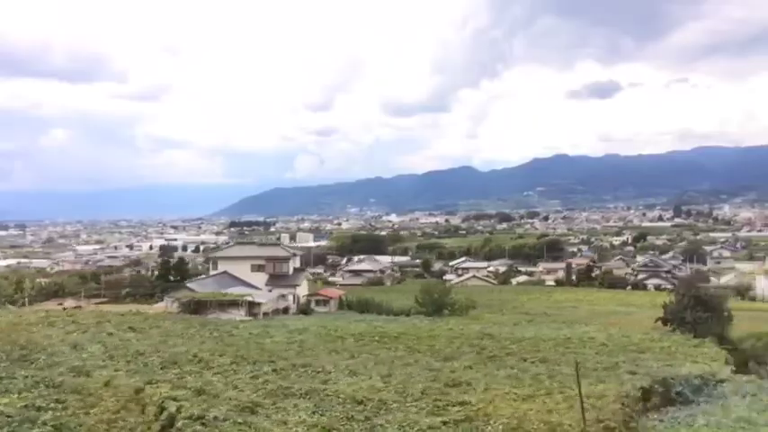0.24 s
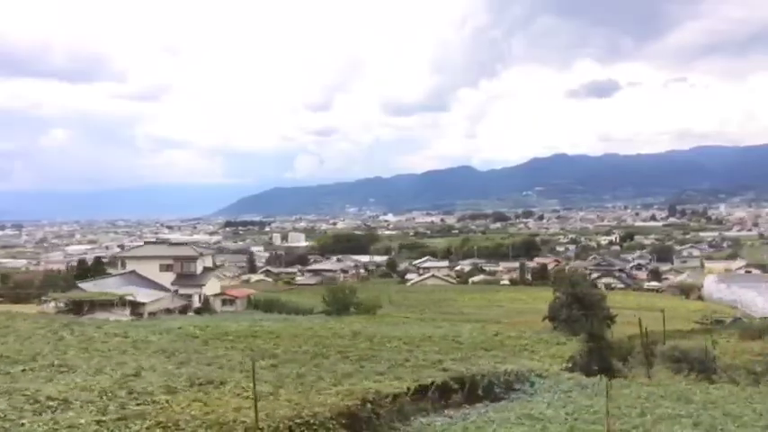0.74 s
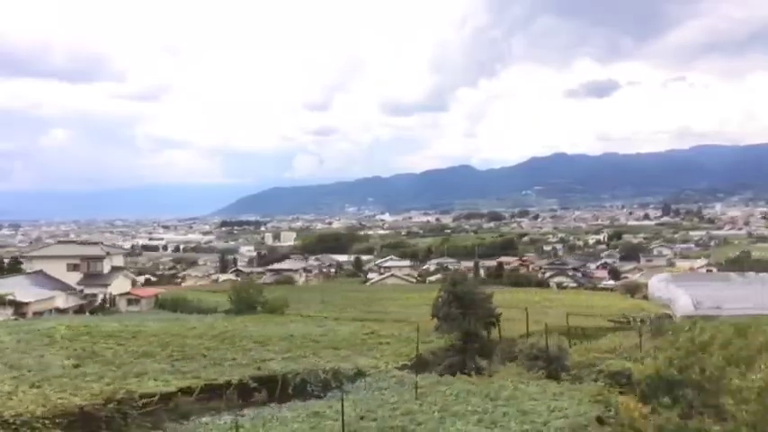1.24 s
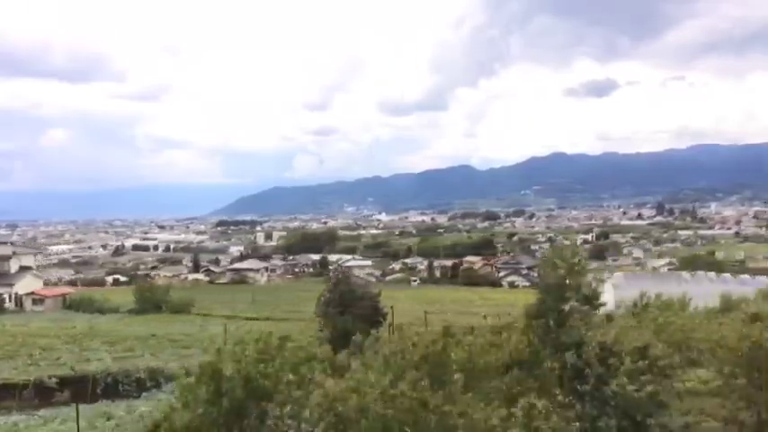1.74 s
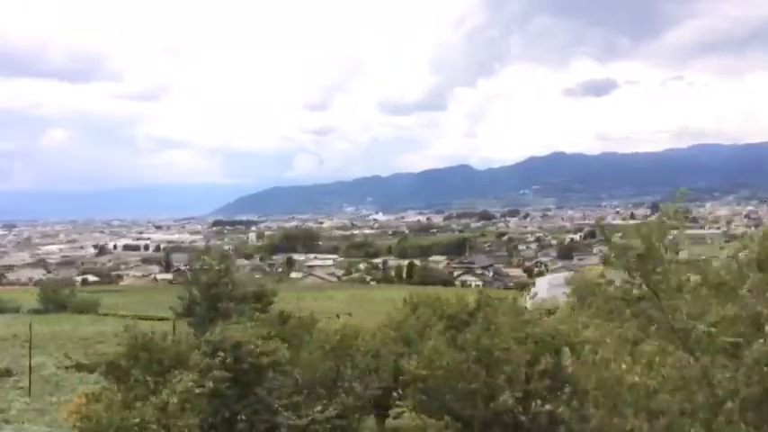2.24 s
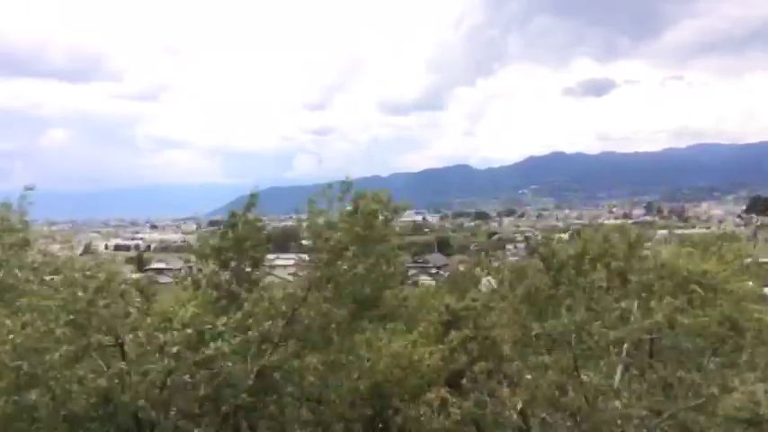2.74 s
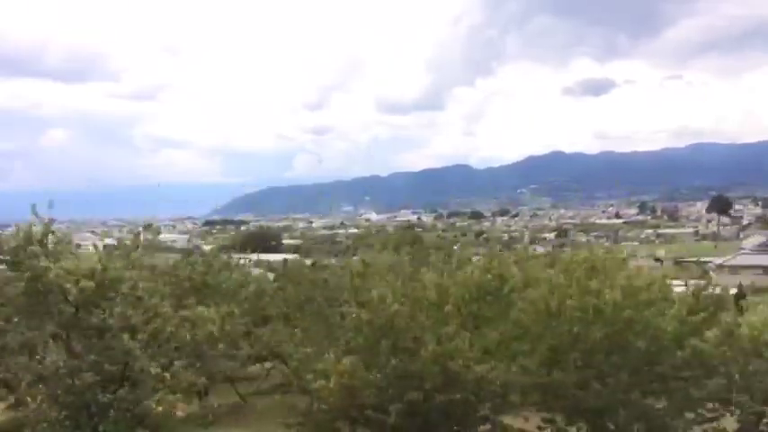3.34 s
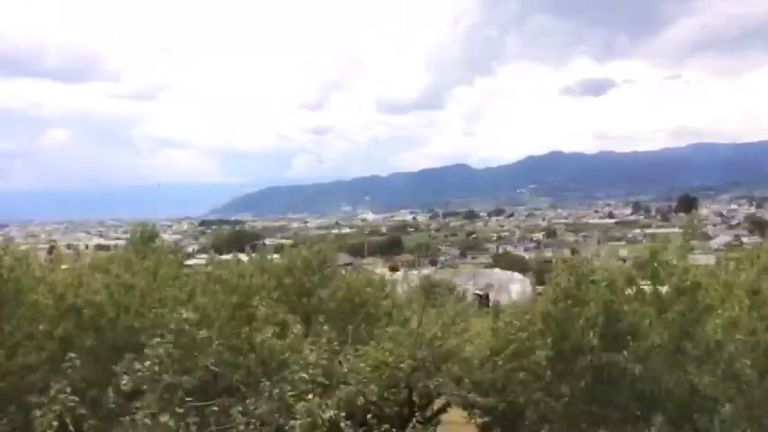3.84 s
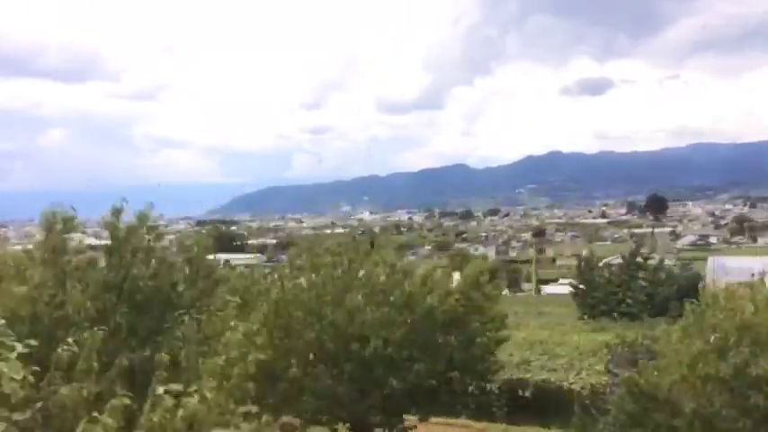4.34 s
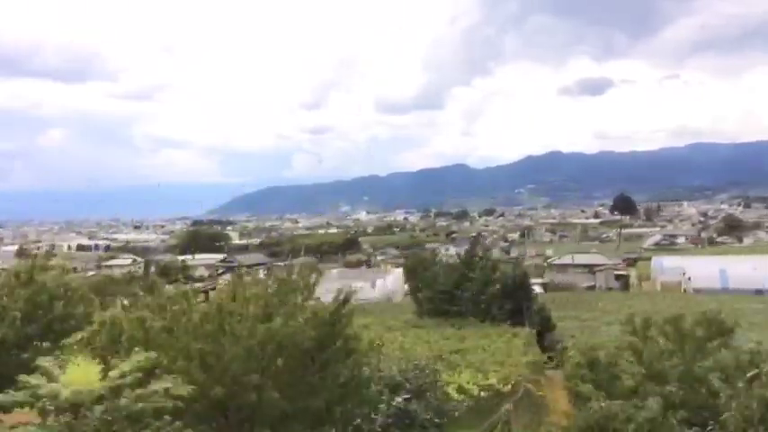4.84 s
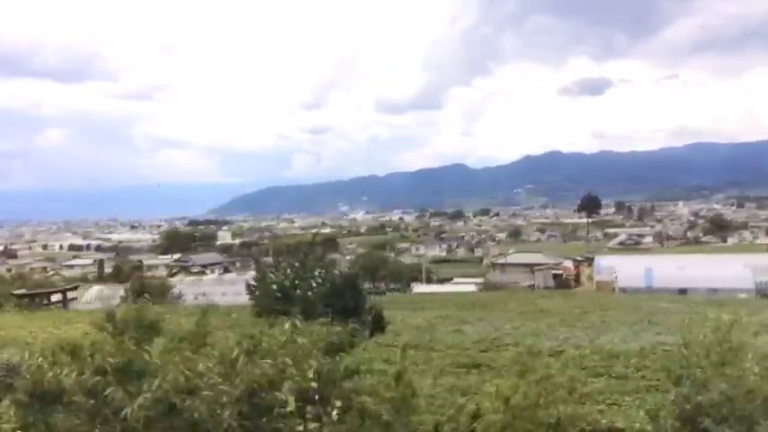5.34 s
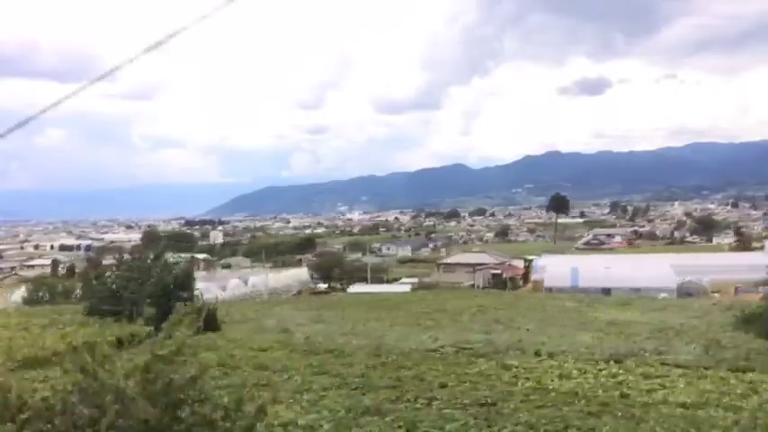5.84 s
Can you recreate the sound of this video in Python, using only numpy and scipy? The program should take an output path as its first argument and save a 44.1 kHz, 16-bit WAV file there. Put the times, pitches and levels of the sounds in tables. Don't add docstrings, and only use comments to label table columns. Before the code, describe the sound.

Heard from inside a fast electric train, close to the window. Air rush, rail hiss and deep floor rumble run throughout. Within the first half second a loose fitting chinks, the pane knocks, the floor thuds and a finger ticks sharply on the camera. Irregular jolts then keep knocking pane, floor and wall panels, with faint rattles between, until an abrupt end.

```python
import sys
import numpy as np
from scipy import signal
from scipy.fft import rfft, irfft
from scipy.io import wavfile
from scipy.ndimage import uniform_filter1d

SR = 44100
rng = np.random.default_rng(int(sys.argv[2]) if len(sys.argv) > 2 else 0)


def put_to_file(sound):
    columns = np.atleast_2d(sound).T
    safe = np.clip(columns, -1, 1)
    whole_steps = np.round(safe * 32767)
    wavfile.write(sys.argv[1], SR, whole_steps.astype(np.int16))


def linear_from_db(decibels):
    return 10 ** (np.asarray(decibels, float) / 20)


N = 269010

# time in seconds, shaking of the floor in dB, drumming of the bogie in dB,
# roughness of the rail head in dB.
TRACK = [(0.0, -28, -30.5, -35.5), (0.25, -30, -30, -35.5), (0.52, -32, -33.5, -36.5), (0.9, -28, -28, -35),
         (1.19, -29, -33, -36), (1.65, -31, -32.5, -35), (2.17, -24, -31, -36), (2.58, -31.5, -34, -36.5),
         (2.84, -31, -32, -36), (3.11, -29.5, -30.5, -36), (3.57, -29.5, -34, -36),
         (4.04, -32.5, -33, -36.5), (4.26, -30.5, -31.5, -35.5), (4.55, -26.5, -30, -36),
         (5.11, -27, -32, -37), (5.49, -32, -33, -36.5), (5.64, -28.5, -32, -34.5), (6.1, -24, -31.5, -38)]


def curve(table, column):
    rows = np.array(table)
    return np.interp(np.arange(N) / SR, rows[:, 0], rows[:, column])


def swing(table, column):
    db = curve(table, column)
    return db - db.mean()


def walk(rate):
    hold = int(SR / rate)
    levels = np.repeat(rng.standard_normal(N // hold + 1), hold)
    return 1.075 * uniform_filter1d(uniform_filter1d(levels, hold), hold)[:N]


def coloured(shape):
    hz = np.arange(N // 2 + 1) * SR / N + 1e-3
    return irfft(rfft(rng.standard_normal(N)) * shape(hz), N)


def band(colour, lo_hz, hi_hz, flicker_db, rate):
    at, db = np.transpose(colour)

    def slice_shape(hz):
        edge = 1 / np.sqrt((1 + (lo_hz / hz) ** 12) * (1 + (hz / hi_hz) ** 12))
        return linear_from_db(np.interp(np.log(hz), np.log(at), db)) * edge

    noise = coloured(slice_shape) * linear_from_db(flicker_db * walk(rate))
    return noise / noise.std()


def add(out, sound, s):
    i = int(round(s * SR))
    out[i:i + len(sound)] += sound[:N - i]


def rush():
    # frequency in Hz, density in dB per Hz.
    air_colour = [(1800, 3), (2300, 1.5), (3000, -5), (4000, -17), (5000, -25), (6300, -30.5),
                  (8000, -40.5), (10000, -46), (15000, -47.5)]
    # frequency in Hz, width in Hz, level in dB.
    wheel_modes = [
        (2520, 80, -4.5),
        (2600, 280, -2),
        (1358, 120, 4.5),
        (1231, 120, -0.5),
        (1546, 170, 3),
        (824, 87, 3.5),
        (5930, 540, -33),
        (3310, 130, -17.5),
    ]
    # time in seconds, gust level in dB.
    gusts = [(0.0, -57), (1.19, -59), (1.61, -57.5), (1.95, -58), (2.26, -61), (2.99, -57), (3.09, -59),
             (3.77, -62), (3.92, -60.5), (4.06, -57), (4.23, -60), (4.48, -58.5), (4.72, -62.5), (5.3, -61),
             (5.66, -60), (6.1, -60.5)]
    at, db = np.transpose(air_colour)
    smooth = coloured(lambda hz: linear_from_db(np.interp(np.log(hz), np.log(at), db)) / (1 + (2000 / hz) ** 6))
    spectrum = rfft(smooth / smooth.std())
    hz = np.arange(N // 2 + 1) * SR / N
    eddies = walk(40)
    gust, rough = swing(gusts, 1), swing(TRACK, 3)
    low_db = -52.5 + 1.1 * gust
    high_db = -47.5 + 0.88 * gust
    ring_db = -50.5 + 0.74 * gust + 0.49 * rough
    air = 0
    for step, up in enumerate([0, 0, .4, .7, 1, 1, 1]):
        share = np.clip(1 - abs(2 * np.log2(hz / 2000 + 1e-9) - step), 0, 1)
        level_db = low_db + up * (high_db - low_db + .9 * eddies) + 2.0 * walk(22)
        air = air + irfft(spectrum * share, N) * linear_from_db(level_db)
    for f, width, db in wheel_modes:
        sway = [coloured(lambda hz: 1 / (1 + (hz / width) ** 2 * 4)) for _ in range(2)]
        turn = 2 * np.pi * np.cumsum(f * (1 + .016 * walk(10))) / SR
        ring = (sway[0] * np.cos(turn) + sway[1] * np.sin(turn)) * linear_from_db(3.0 * walk(14))
        air = air + linear_from_db(db + ring_db) * ring / ring.std()
    return air


def rolling():
    # frequency in Hz, density in dB per Hz.
    carriage = [(20, -27), (40, -13.5), (62, 5.5), (100, -0.5), (160, 0), (230, 2.5), (300, -2.5),
                (380, -4), (520, 0.5), (800, -1), (970, -3), (1350, 1.5), (1700, -7), (2200, -12)]
    shake, drum, rough = swing(TRACK, 1), swing(TRACK, 2), swing(TRACK, 3)
    sway = linear_from_db(-38.5 + .4 * shake) * band(carriage, 15, 60, 1.5, 12)
    boom = linear_from_db(-27 + .9 * shake) * band(carriage, 56, 165.6, 2.2, 30)
    walls = linear_from_db(-28.5 + .3 * shake + 1.2 * drum) * band(carriage, 160, 372.0, 2.1, 40)
    roar = linear_from_db(-36.0 + 0.59 * drum + 0.2 * rough) * band(carriage, 380, 1100, 1.6, 30)
    song = linear_from_db(-37.5 + 1.8 * rough) * band(carriage, 972, 2160, 1.8, 25)
    return sway + boom + walls + roar + song


def chinks():
    # start in seconds, peak in dB, fitting. The "latch" rows at 2.41 s and 2.601 s
    # are small knocks of the pane, ringing near 480 Hz.
    contacts = [(.17, -26, "brake"), (0.219, -36, "rack"), (0.501, -37.5, "rack"), (0.649, -52, "rod"),
                (.76, -44, "rod"), (1.133, -30.5, "latch"), (1.565, -67, "clip"), (1.568, -46, "rod"),
                (1.68, -32.5, "brake"), (1.755, -61, "strap"), (1.82, -60, "strap"), (2.111, -21, "frame"),
                (2.13, -66, "hinge"), (2.41, -21, "latch"), (2.517, -18.5, "frame"), (2.551, -39.5, "rod"),
                (2.94, -68, "clip"), (2.601, -24, "latch"), (2.955, -65, "clip"), (3.515, -68, "clip"),
                (4.059, -28.5, "brake"), (4.07, -72, "clip"), (4.469, -46, "rod"), (5.155, -35, "rack"),
                (5.17, -36.5, "hook"), (5.75, -61, "strap"), (5.63, -29.5, "brake")]
    # frequency in Hz, width in Hz, decay by 60 dB in seconds.
    fittings = dict(latch=(480, 165, .045), strap=(6100, 500, .08), clip=(10000, 8500, .04),
                rack=(2550, 350, .1), hook=(2250, 600, .15), rod=(3000, 900, .04), frame=(800, 250, .03),
                hinge=(7500, 1500, .1), brake=(1330, 100, .45))
    out, t = np.zeros(N), np.arange(SR // 2) / SR
    for (s, db, fitting), noise in zip(contacts, rng.standard_normal((len(contacts), len(t)))):
        hz, width, t60 = fittings[fitting]
        edges = np.clip([hz - width / 2, hz + width / 2], 100, 16000)
        resonance = signal.butter(3, edges, "bandpass", fs=SR, output="sos")
        envelope = linear_from_db(-60 * t / t60) * (1 - np.exp(-t / .004))
        scrape = signal.sosfilt(resonance, noise * envelope)
        add(out, linear_from_db(db) * scrape / abs(scrape).max(), s)
    return out


def thuds():
    # centre in seconds, peak in dB, frequency in Hz.
    floor_jolts = [(0.35, -5.5, 120), (0.581, -10.5, 93), (0.796, -15.5, 140), (0.883, -18, 94),
                   (1.251, -12, 105), (1.349, -14, 97), (1.537, -11.5, 93.5), (1.829, -13.5, 91),
                   (1.913, -12, 102), (1.999, -8, 161), (2.039, -7, 93), (2.084, -11, 105),
                   (2.22, -10.5, 106), (2.302, -6.5, 97), (2.533, -8.5, 125.5), (3.059, -13.5, 114),
                   (3.126, -5.5, 95), (3.427, -9.5, 136), (3.605, -14.5, 112), (3.847, -11.5, 99),
                   (4.361, -14.5, 98), (4.497, -9.5, 103), (4.569, -9.5, 100), (4.671, -4.5, 95),
                   (4.755, -10, 104.5), (4.958, -13, 87), (5.001, -6, 87), (5.062, -5, 85),
                   (5.355, -10.5, 89), (5.886, -5.5, 79)]
    # centre in seconds, peak in dB, frequency in Hz.
    wall_jolts = [(0.782, -11, 240), (0.803, -8, 212), (0.837, -15, 261), (0.862, -11, 203),
                  (0.906, -15, 249), (0.924, -11, 224), (1.16, -13.5, 160), (1.986, -11.5, 221),
                  (2.014, -14.5, 262), (2.089, -17, 215), (2.22, -13, 225), (2.239, -18, 213),
                  (2.37, -10.5, 195), (2.42, -10.5, 190), (2.537, -14, 216), (2.547, -15, 239),
                  (2.61, -13, 190), (3.011, -15, 300), (3.429, -8.5, 189), (3.735, -11.5, 180),
                  (4.431, -13.5, 263), (4.56, -12, 206), (4.575, -12.5, 232), (4.609, -18, 222),
                  (4.666, -15, 225), (5.671, -8.5, 210), (5.693, -9.5, 237), (5.879, -10, 246),
                  (5.946, -11, 233), (6.08, -16, 250)]
    lurch_hz, lurch_db = 52, -19
    jolts = floor_jolts + wall_jolts
    out, phase = np.zeros(N), rng.random((len(jolts), 1))
    t = np.arange(-2000, 2000) / SR
    for (s, db, hz), turn in zip(jolts, phase):
        swell = np.exp(-(t * np.sqrt(hz / 100) / .0095) ** 2)
        add(out, linear_from_db(db - 4.0) * swell * np.cos(2 * np.pi * (hz * t + turn)), s + t[0])
        lurch = np.exp(-(t / 0.014) ** 2) * np.cos(2 * np.pi * (lurch_hz * t + turn))
        add(out, (hz < 160) * linear_from_db(db + lurch_db) * lurch, s + t[0])
    return out


def tick():
    # time in seconds, peak in dB.
    touches = [
        (0.3842, -5.5),
    ]
    out, t = np.zeros(N), np.arange(-40, 600) / SR
    dip = -1.15 * np.exp(-(t / .000115) ** 2)
    spring = (1 + np.tanh((t - .00012) / .00012)) / 2
    ripple = 1 + 0.48 * np.cos(2 * np.pi * 800 * (t - .0004))
    rebound = 0.48 * spring * np.exp(-t / 0.0019) * ripple
    case = signal.butter(8, 3950, fs=SR, output="sos")
    for s, db in touches:
        add(out, linear_from_db(db) * signal.sosfilt(case, dip + rebound), s + t[0])
    return out


def pane():
    # frequency in Hz, level in dB, decay by 60 dB in seconds, sign at the microphone.
    pane_modes = [(116.0, -5.3, 0.096, 1.0), (125.3, -13.5, 0.298, -1.0), (163.6, -12.9, 0.089, -1.0),
                  (200.7, -19.4, 0.144, -1.0), (242.5, -13.0, 0.116, 1.0), (287.5, -22.1, 0.156, 1.0),
                  (335.3, -30.9, 0.211, -1.0), (429.7, -6.5, 0.046, 1.0), (463.6, -11.1, 0.059, 1.0),
                  (560.8, -13.2, 0.047, -1.0), (600.2, -25.3, 0.067, -1.0)]
    # start in seconds, strength in dB, extra share of the slow modes in dB; the
    # close rows around 2.52 s interfere and sound as one short bright knock.
    knocks = [(0.3144, 3, -2.5), (0.4332, -1.5, -5.5), (0.8669, -9.5, 2.5), (0.888, -9, -16.5),
              (0.8972, -9.5, -4.5), (2.0127, -1, 1), (2.5144, -6, -1), (2.5188, 2, -5), (2.5202, 4.5, -19),
              (2.5289, -4, -18), (2.5473, -5.5, -20), (3.108, -2, 0), (3.4062, -6, 0), (3.562, -4, 2.5),
              (3.5966, -6, -2), (3.723, 1.5, -2), (3.9794, -9, 1), (4.3074, -7.5, 0), (4.4541, 2, -1.5),
              (4.6196, 0, -1), (4.6552, -12, 10.5), (4.8195, -0.5, -3), (4.9274, 2.5, -2.5),
              (4.9679, 3.3, -4.5), (5.2935, 2, -1), (5.4202, -5, -1), (5.817, 2.5, 1.5), (5.858, -3.5, -9),
              (5.8651, -1, -24), (5.9199, 1.5, 2.4)]
    hz, db, t60, side = np.transpose(pane_modes)
    out, scatter = np.zeros(N), rng.standard_normal((len(knocks), len(hz)))
    t = np.maximum(np.arange(SR // 2)[:, None] / SR - .067 / np.sqrt(hz), 0)
    modes = np.sin(2 * np.pi * hz * t) * linear_from_db(-60 * t / t60) * (1 - np.exp(-t / .005))
    for (s, blow_db, slow_db), chance in zip(knocks, scatter):
        mode_db = db + blow_db + slow_db * (hz < 280) + 2.4 * chance
        add(out, modes @ (side * linear_from_db(mode_db)), s)
    return out


def scene():
    return (rush() + rolling() + chinks() + thuds() + tick() + pane())[None]


def band_limit(x):
    return signal.sosfilt(signal.butter(12, 15300, fs=SR, output="sos"), x)


def record(dry):
    gain_hold_s, gain_slope, gain_db = 0.15, 0.096, -22
    n = np.arange(N)
    gate = np.clip((N - n) / 300, 0, 1) * np.clip(.45 + n / 100, 0, 1)
    keep = np.exp(-1 / (gain_hold_s * SR))
    usual_power = linear_from_db(2 * gain_db)
    power = signal.lfilter([1 - keep], [1, -keep], dry ** 2, zi=[[usual_power]])[0]
    eased = dry * (usual_power / power) ** (gain_slope / 2)
    rounded = np.tanh(eased / 1.5) * 1.5
    top = signal.ellip(10, .2, 60, 15250, fs=SR, output="sos")
    return band_limit(signal.sosfilt(top, rounded * gate))


dry = scene()
out = record(dry)
put_to_file(out)
```